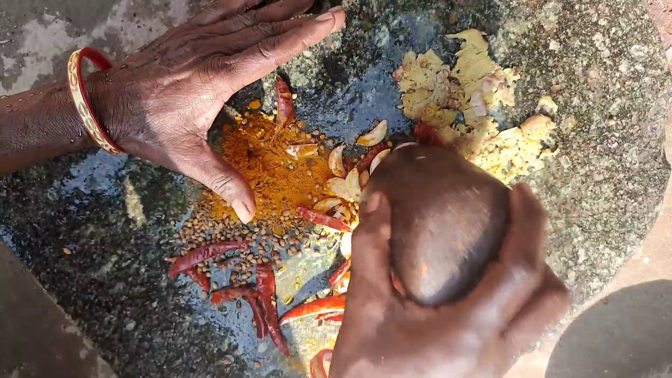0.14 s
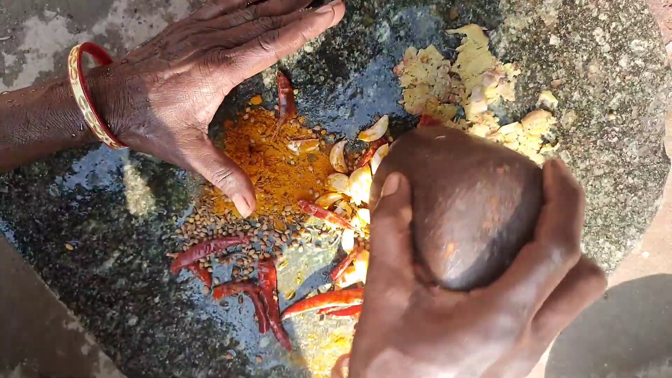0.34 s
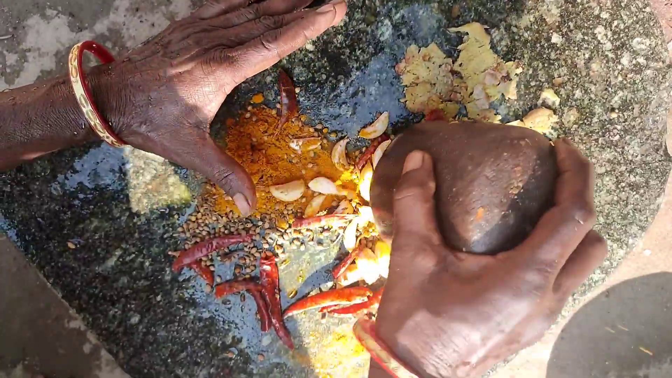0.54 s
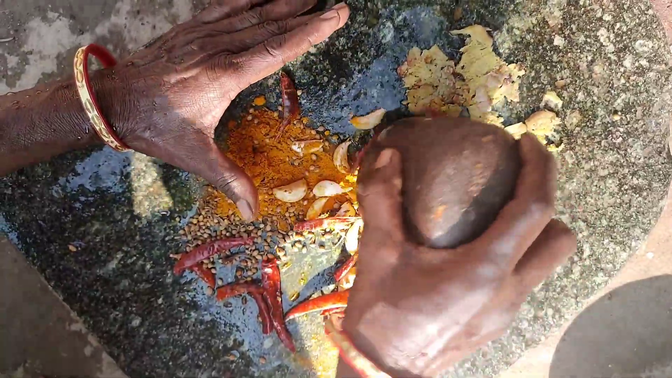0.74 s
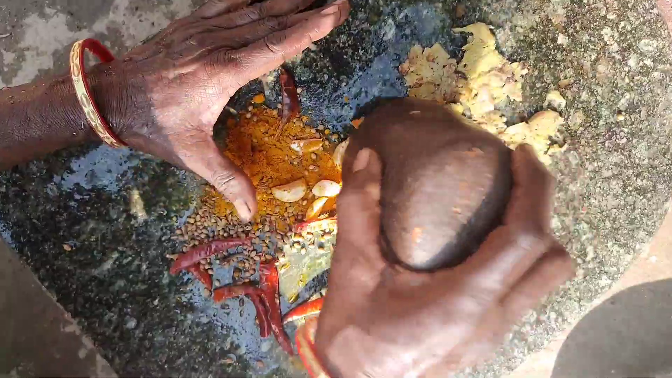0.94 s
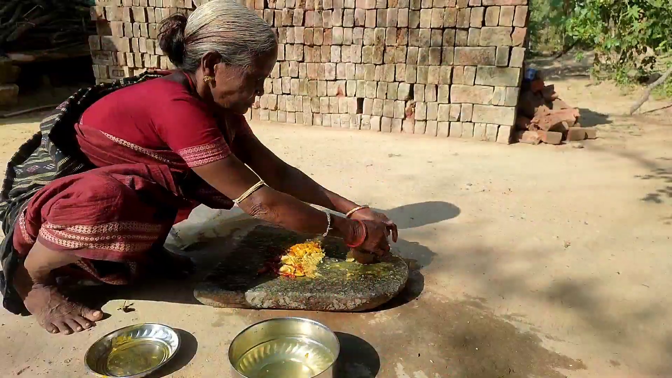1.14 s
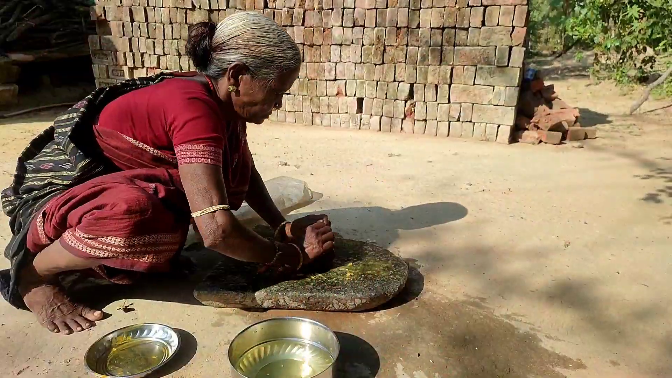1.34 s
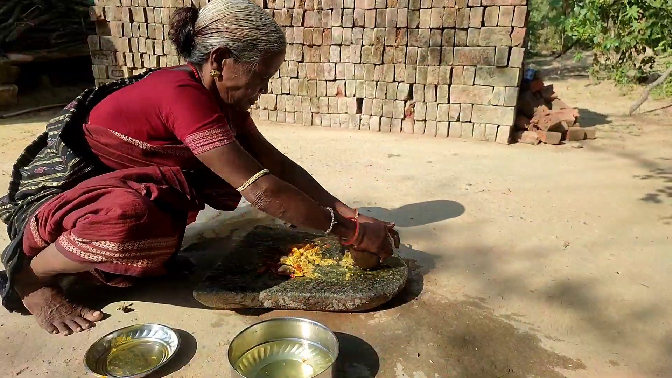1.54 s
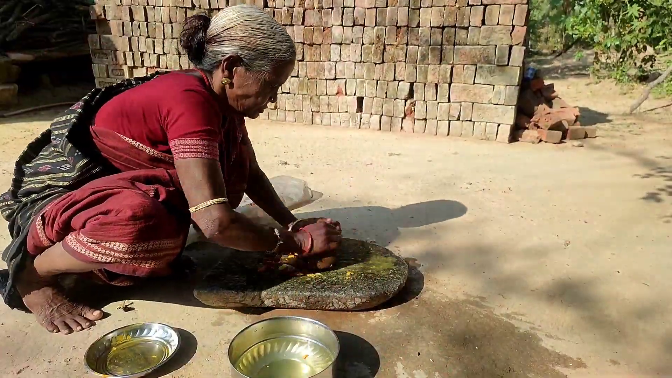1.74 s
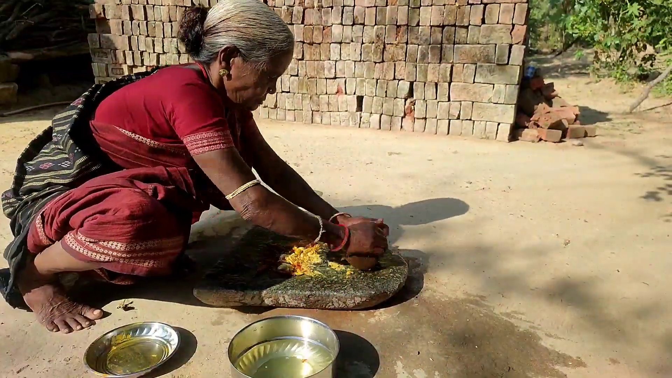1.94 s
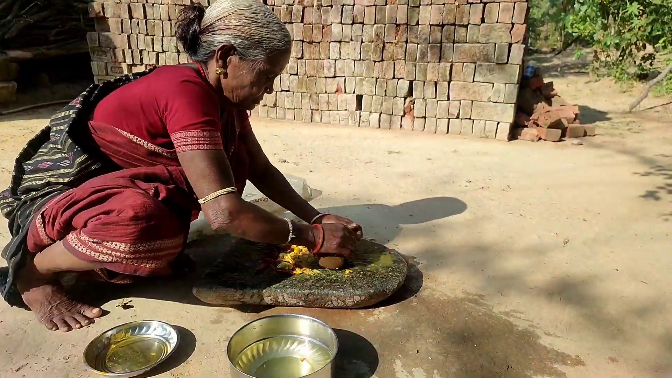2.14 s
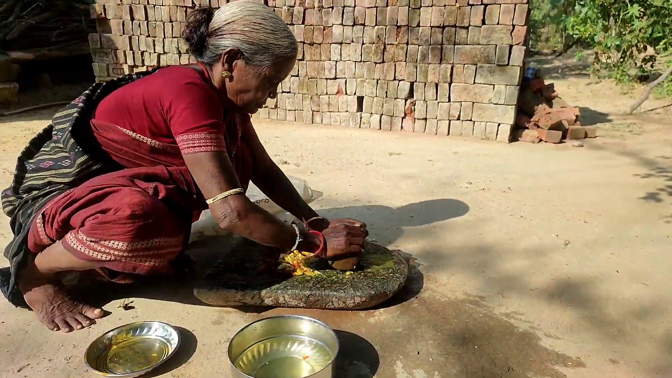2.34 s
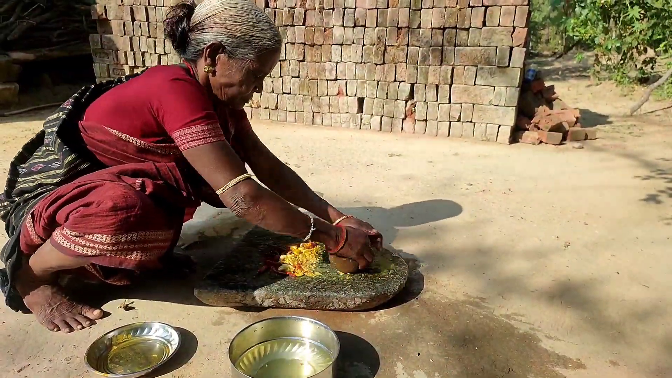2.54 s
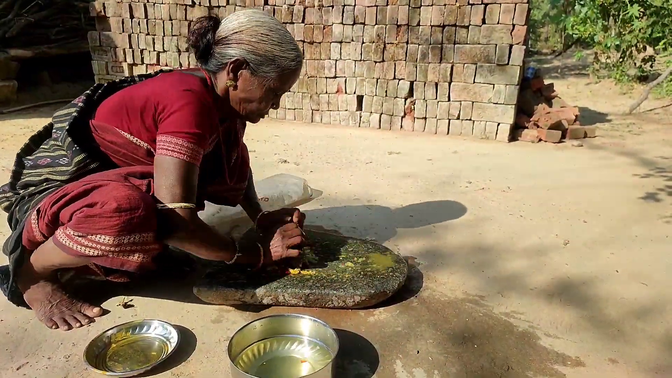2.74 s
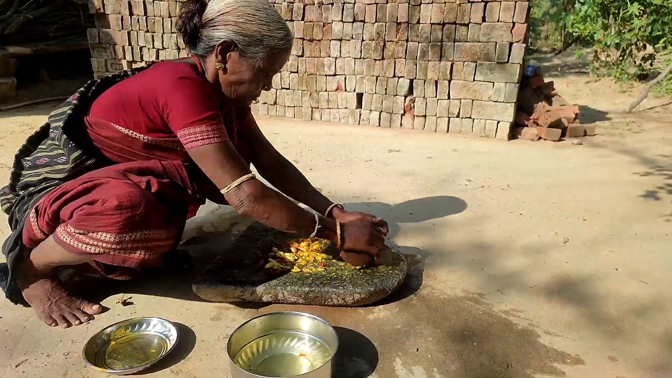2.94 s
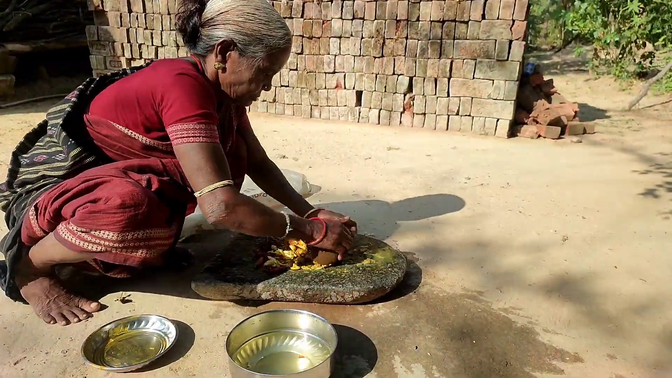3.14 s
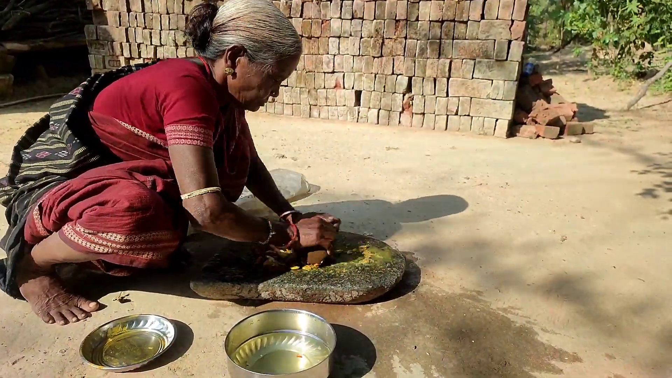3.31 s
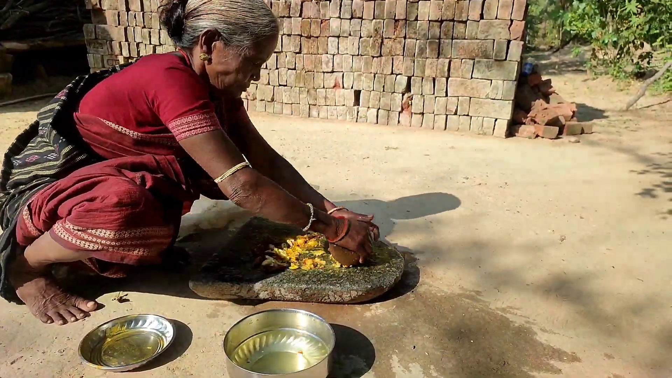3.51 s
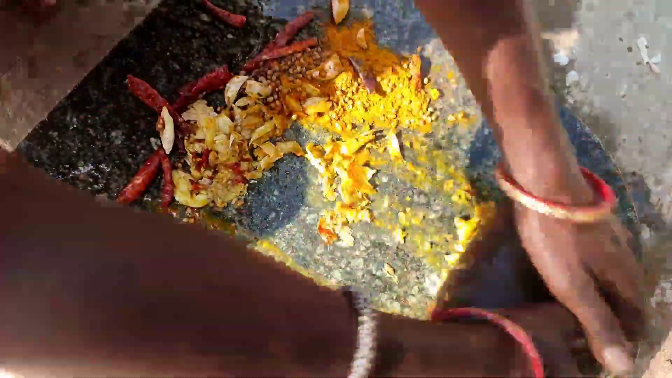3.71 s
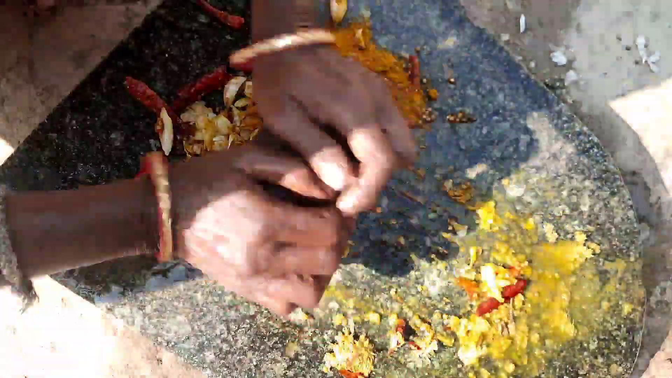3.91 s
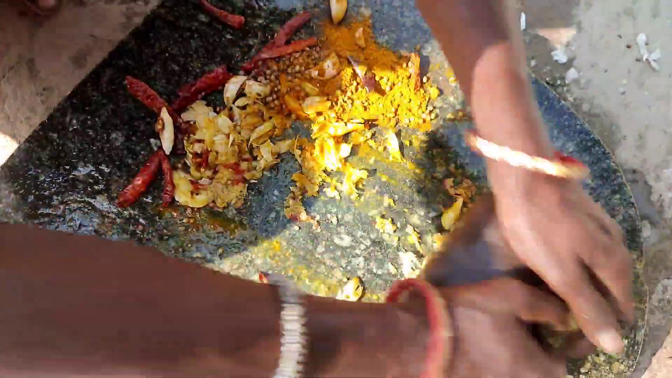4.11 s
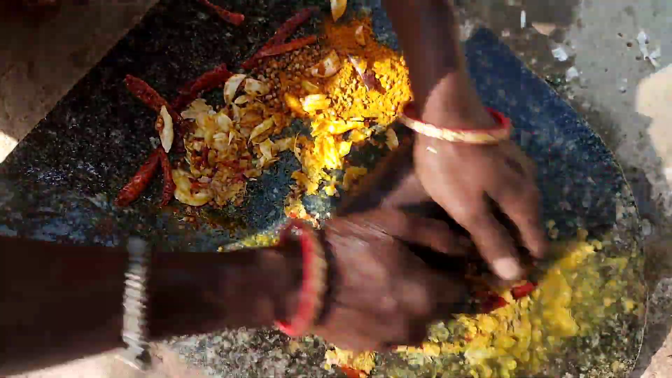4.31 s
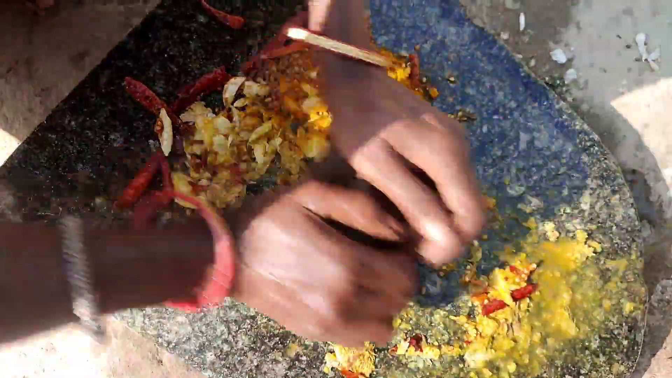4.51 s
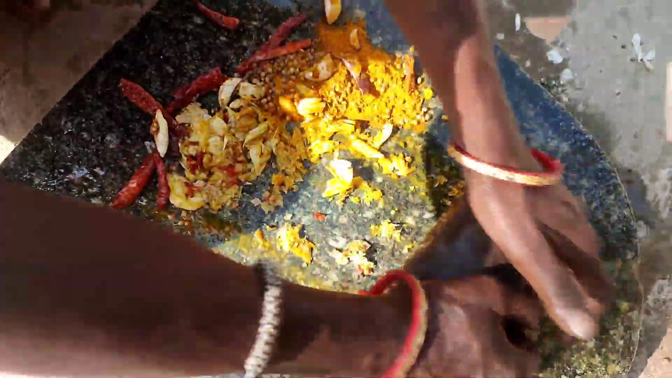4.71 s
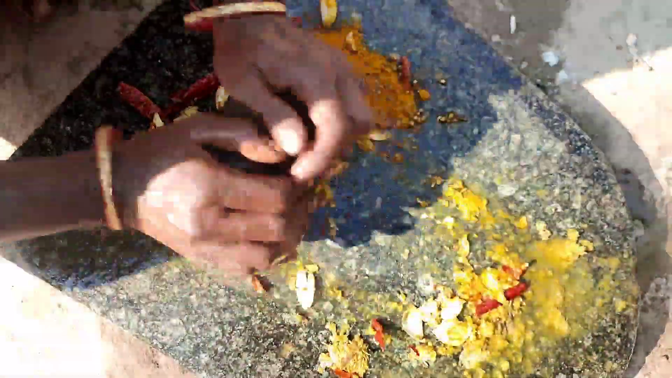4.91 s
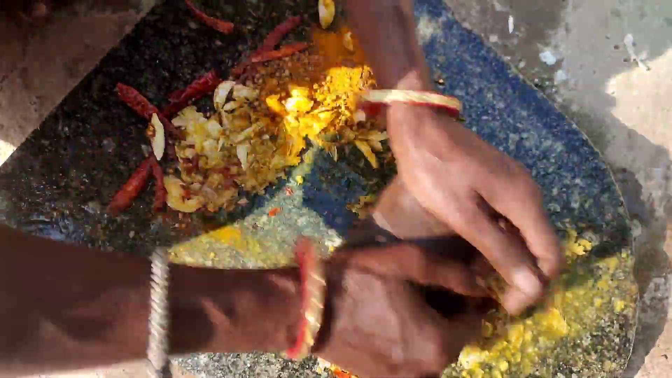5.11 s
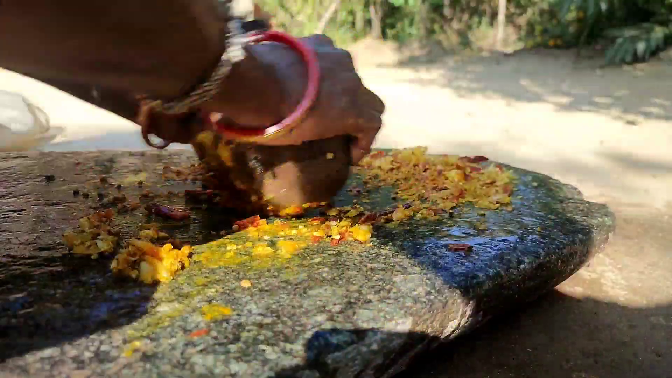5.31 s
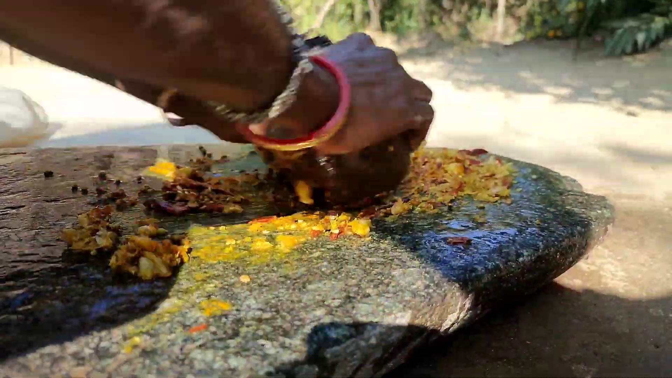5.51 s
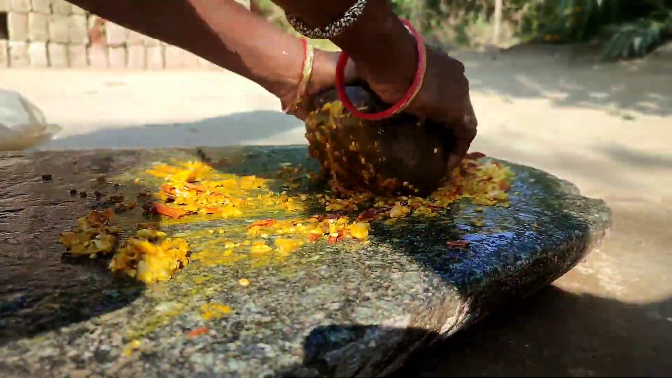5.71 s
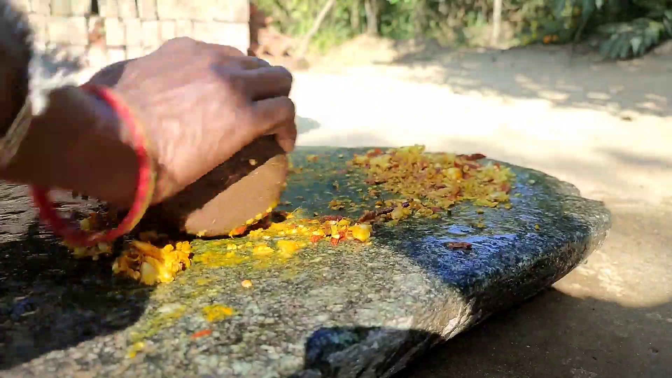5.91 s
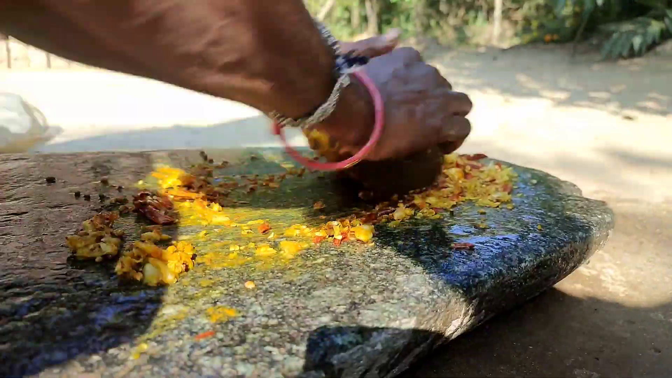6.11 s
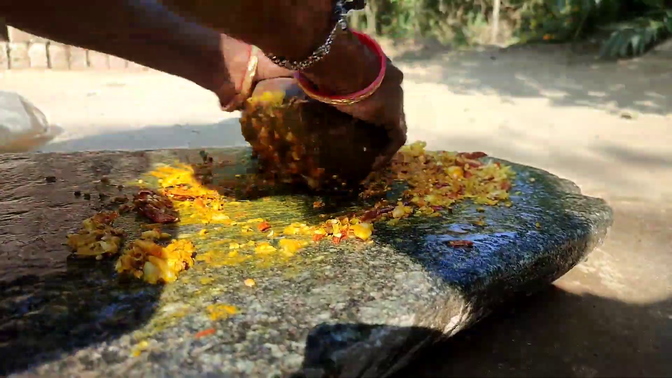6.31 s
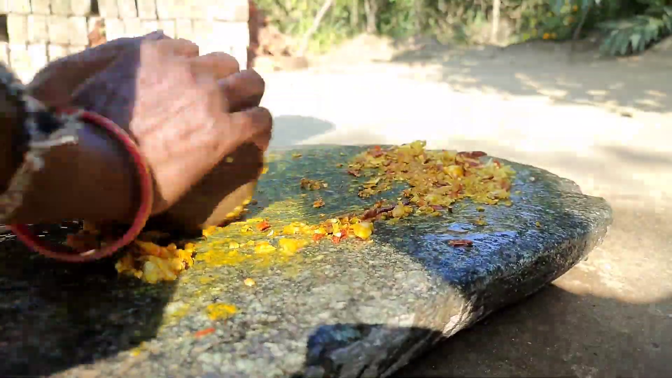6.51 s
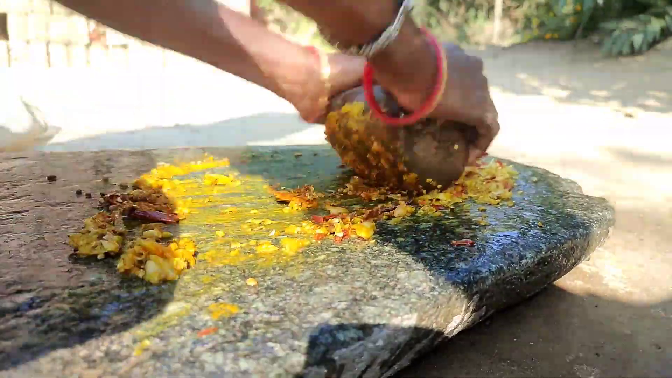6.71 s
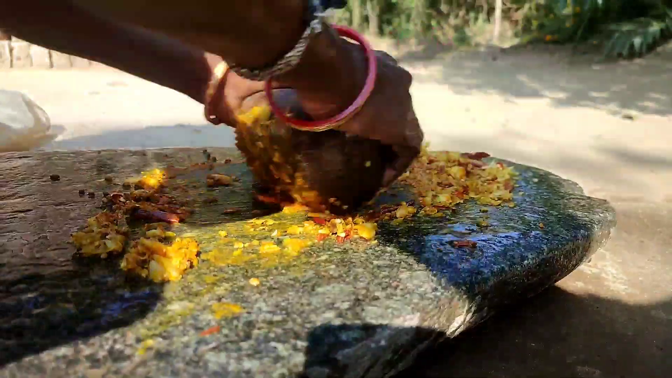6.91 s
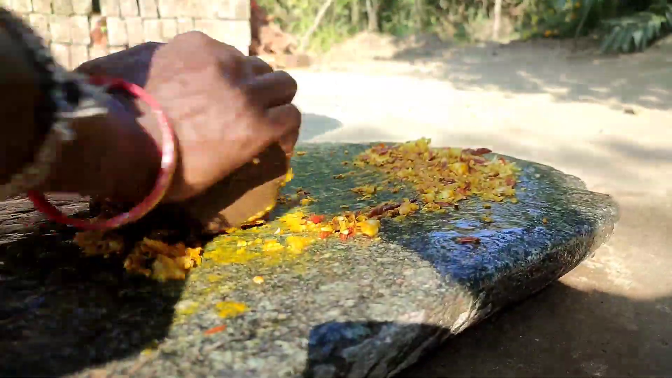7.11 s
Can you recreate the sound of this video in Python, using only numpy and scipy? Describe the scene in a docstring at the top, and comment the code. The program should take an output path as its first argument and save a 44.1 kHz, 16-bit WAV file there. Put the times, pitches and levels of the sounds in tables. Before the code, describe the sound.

Close up, a heavy stone crushes dry spices on a slab in four sharp, crunchy thumps, with faint scraping between. Then the view shifts and steady short grinding strokes follow, about four a second, gritty and hissing, with small bright stone clicks. The strokes grow louder and lower towards the end, after one more knock. Quiet open yard, light wind rumble, close stereo microphone.

```python
"""A round hand stone works spices on a flat stone slab that lies on the earth of an open yard.
It pounds four times in the first 1.1 s and once more at 5.5 s: noise cracks over a band-passed thud and slab modes.
It scrapes as it is lifted or twisted between blows until 1.3 s, then slides to and fro in short strokes:
banded random grit, with slab rumble, dull knocks and ringing clicks, heard close, then from three other places in turn.
Behind it: yard echo, filtered-noise wind and air, a low wavering sine hum and a faint far-off call of gliding sines."""
import sys
import numpy as np
from scipy import signal
from scipy.fft import rfft, irfft, next_fast_len
from scipy.io import wavfile
from scipy.ndimage import uniform_filter1d

SR = 44100
rng = np.random.default_rng(int(sys.argv[2]) if len(sys.argv) > 2 else 0)


def store_wav(level_fs):
    """Save 16-bit WAV to argv[1]."""
    pcm = np.round(np.clip(np.atleast_2d(level_fs), -1, 1) * 32767)
    wavfile.write(sys.argv[1], SR, pcm.T.astype(np.int16))


N = 315315
TIME = np.arange(N) / SR


def amp(db):
    """Decibels to gain."""
    return 10 ** (np.asarray(db) / 20)


def unit(x):
    """Scale so that the mean of the channels has rms 1."""
    mid = np.atleast_2d(x).mean(axis=0)
    return x / np.sqrt(np.mean(mid ** 2) + 1e-20)


def band(x, low_hz, high_hz, order=2):
    """Butterworth band-pass."""
    sos = signal.butter(order, [low_hz, min(high_hz, .47 * SR)], "band", fs=SR, output="sos")
    return signal.sosfilt(sos, x + 1e-18)


def colour(x, spectrum):
    """Minimum-phase filter that follows (f/Hz, gain/dB) rows, by way of the folded cepstrum."""
    size = 2 * next_fast_len(x.shape[-1] // 2 + 2048)
    hz, db = np.transpose(spectrum)
    bin_hz = np.arange(size // 2 + 1) * SR / size
    log_gain = np.log(amp(np.interp(np.log(bin_hz + 1), np.log(hz), db)))
    cepstrum = irfft(log_gain)
    cepstrum[1:size // 2] *= 2
    cepstrum[size // 2 + 1:] = 0
    response = np.exp(rfft(cepstrum))
    return irfft(rfft(x, size) * response)[..., :x.shape[-1]]


def drift(per_s):
    """Normal random points, per_s a second, joined by straight lines."""
    return np.interp(TIME * per_s, np.arange(8192), rng.standard_normal(8192))


def stereo(three, likeness):
    """One shared and two separate signals make a pair of given likeness."""
    c = np.clip(likeness, 0, 1)
    return np.sqrt(c) * three[0] + np.sqrt(1 - c) * three[1:]


def pan(db):
    """Left and right gains, left re right in dB, whose mean is 1."""
    gains = amp(np.array([db, -db]).reshape(2, -1) / 2)
    return gains / gains.mean(axis=0)


def add(out, s, sound):
    """Mix a sound in at a time."""
    at = max(round(s * SR), 0)
    out[:, at:at + sound.shape[-1]] += sound[..., :N - at]


def background(wind_trim_db=-2, hum_db=-67, hum_hz=79.9, waver_hz=1.0, half_order_db=-8,
               swell_db=9, swell_s=0.17, air_db=-78, hiss_db=-79.0):
    """Wind on the microphone, a low hum that swells and fades as of a distant engine, and still air."""
    # wind strength: t/s, level before trim/dB
    gusts = [(0, -45), (.1, -52), (.4, -47), (.95, -57), (1.07, -41.5), (1.39, -58.5), (5.3, -58),
             (5.6, -50.5), (5.85, -58.5), (7.15, -51.5)]
    # wind spectrum: f/Hz, gain/dB
    wind_colour = [(18, -4.5), (45, -7), (62, -9), (90, -16.5), (130, -20)]
    # centres of the hum's swells: t/s
    swells_s = [1.75, 2.45, 3.15, 4.22, 4.95, 6.1, 6.7]
    gust_s, gust_db = np.transpose(gusts)
    wind = colour(stereo(rng.standard_normal((3, N)), likeness=0.55), wind_colour)
    wind = amp(np.interp(TIME, gust_s, gust_db) + wind_trim_db) * unit(band(wind, 13.0, 130))
    phase = 2 * np.pi * np.cumsum(hum_hz + waver_hz * drift(11)) / SR
    swell = swell_db * sum(np.exp(-np.minimum(np.abs(TIME - s) / swell_s, 10) ** 2) for s in swells_s)
    tone = np.sin(phase) + amp(half_order_db) * np.sin(phase / 2)
    hum = amp(hum_db + swell + 1.0 * drift(21)) * np.sqrt(2) * tone
    air = stereo(rng.standard_normal((3, N)), likeness=0.064)
    air = amp(air_db) * unit(band(air, 100, 1120, order=1))
    hiss = stereo(rng.standard_normal((3, N)), likeness=0.055)
    hiss = amp(hiss_db) * unit(band(hiss, 900, 4000, order=2))
    return wind * pan(4.4) + hum + air + hiss


def far_call(overtone_db=-17, arch=0.047, waver=0.024):
    """A thin, nearly pure call from far away, perhaps a cockerel; pitch rises and falls with each note's swell."""
    # notes: start/s, length/s, base f/Hz, level/dB
    notes = [(0, 0.18, 341, -68), (0.134, 0.076, 507, -66.5), (0.322, .2, 512, -68.5),
             (.55, 0.65, 541, -78)]
    out = np.zeros(N)
    for start_s, length_s, hz, level_db in notes:
        effort = np.sin(np.pi * np.clip((TIME - start_s) / length_s, 0, 1))
        phase = 2 * np.pi * np.cumsum(hz * (1 + arch * effort + waver * drift(59))) / SR
        overtones = np.sin(2 * phase) + np.sin(3 * phase)
        out += amp(level_db) * effort * (np.sin(phase) + amp(overtone_db) * overtones)
    return out


def yard_echo(x, near_db=-21, near_s=0.025, wall_db=-31, wall_s=0.1, wall_spread_s=0.024):
    """Scatter from the ground and things nearby, then a weak smeared echo from a brick wall."""
    t = np.arange(SR // 4) / SR
    near = np.exp(-t / near_s) * (t > .003)
    wall = np.exp(-((t - wall_s) / wall_spread_s) ** 2)
    shape = amp(near_db) * near / np.linalg.norm(near) + amp(wall_db) * wall / np.linalg.norm(wall)
    echo = band(shape * rng.standard_normal((2, len(t))), 400, 14000, order=1)
    return signal.fftconvolve(x, echo, axes=1)[:, :N]


def clicking(bounce_s=.0008, bounce=1.0, scatter_db=-19, scatter_s=0.0029,
             ring_trim_db=-6, clack_trim_db=-6, snap_trim_db=-6):
    """Stone touches bare stone twice within a millisecond; ring pitch depends on the point of contact."""
    # touches: t/s, ring f/Hz, ring, clack and snap before trim/dB, left re right/dB
    clicks = [(0.536, 3930, -42.5, -72, -50.5, -1), (0.6122, 6600, -60.5, -77, -75, -12),
              (1.1692, 6540, -52.5, -61.5, -63, -6), (1.263, 4870, -52.5, -65, -57, -10),
              (1.651, 5200, -46.5, -62, -49.5, -7.5), (1.919, 3900, -44, -73, -52, -8),
              (2.078, 5650, -42.5, -62, -34, -6), (2.5146, 6400, -49.5, -60.5, -41, -9),
              (2.677, 6260, -57.5, -62, -51, -11), (2.7678, 4870, -48, -56, -55, -6),
              (2.8774, 5430, -45.5, -47.5, -50.5, -10), (3.3557, 6710, -55, -64, -58, -3),
              (3.641, 7400, -43.5, -74, -46, -1), (3.7628, 6500, -41, -44, -33.5, -7),
              (4.0015, 5070, -41.5, -56, -49.5, -2), (4.2176, 5330, -45.5, -53, -46, -5),
              (4.581, 4650, -44, -61, -54, -13), (4.683, 6140, -54, -58, -47.5, -12),
              (4.7343, 5860, -38, -52, -43, -14), (5.2317, 5260, -34, -51.5, -40.5, -9.5),
              (5.6856, 5500, -52, -52, -53.5, 7.5), (6.039, 7400, -49.5, -69, -49, 11),
              (6.0667, 4900, -52, -77, -64, 4), (6.0845, 4770, -42.5, -69, -50, 6),
              (6.5815, 4500, -41.5, -79, -48.5, 4.5), (6.672, 4600, -39.5, -76, -64.5, -1),
              (6.8312, 5040, -48, -50, -49.5, 5.5)]
    out, t = np.zeros((2, N)), np.arange(SR // 30) / SR
    for s, hz, ring_db, clack_db, snap_db, pan_db in clicks:
        touch = amp(scatter_db) * rng.standard_normal((2, len(t))) * np.exp(-t / scatter_s)
        touch[0, 3] += 1
        touch[1, 0] += 1   # the right port is a little nearer
        touch[:, round(bounce_s * SR)] += bounce * (2 * rng.random(2) - 1)
        ring = amp(ring_db + ring_trim_db) * unit(band(touch, hz * 0.73, hz * 1.35))
        clack = amp(clack_db + clack_trim_db) * unit(band(touch, 1340, 2760))
        snap = amp(snap_db + snap_trim_db) * unit(band(touch, 9900, 13100))
        add(out, s, (ring + clack + snap) * pan(pan_db))
    return out


def grit(per_s, hiss_db, spread_db=3):
    """Grains break at random, most small and a few large, over the even hiss of rubbing stone."""
    sizes = amp(spread_db * np.minimum(rng.exponential(1, N), 6))
    grains = (rng.random(N) < per_s / SR) * sizes * rng.standard_normal((3, N))
    return grains / grains.std() + amp(hiss_db) * rng.standard_normal((3, N))


def slab_response(rumble, knock_t60_s=0.056, rise_s=0.00046, overtones=(2.28, 3.6), roll_db=0, rest_db=-74):
    """The slab rumbles under the moving stone and gives brief dull knocks, damped by the hand."""
    # slab under the rolling stone: f/Hz, gain/dB
    roll_colour = [(100, -7.5), (160, 0.5), (215, 3), (270, -3), (330, -7.5), (450, -9.5), (800, -18),
                   (1500, -31)]
    # dull knocks of the slab: tipping stone, the fifth blow's body at 5.52 s and low rumble lumps near 6.1 s:
    # t/s, level/dB, f/Hz, overtones re fundamental/dB
    knocks = [(1.222, -49, 323, -6), (1.243, -41, 320, -8), (1.26, -35.5, 255, -10.5),
              (1.325, -45.5, 287, -1), (1.945, -43.5, 236, -22), (2.67, -37, 283, -4),
              (2.678, -43, 352, -2.5), (4.01, -49, 318, -10), (4.881, -39.5, 184, -8),
              (5.128, -45.5, 234, -8), (5.521, -27.5, 447, -9), (5.523, -27, 265, -17),
              (6.102, -36, 215, -22), (6.126, -38.5, 320, -14), (6.145, -34.5, 225, -19),
              (6.186, -40, 256, -19)]
    lumps = stereo(grit(per_s=600, spread_db=1, hiss_db=1.5), likeness=0.83)
    out = np.hypot(amp(roll_db) * rumble, amp(rest_db)) * unit(colour(lumps, roll_colour))
    t = np.arange(SR // 5) / SR
    fade = amp(-60 * t / knock_t60_s) * (1 - np.exp(-t / rise_s))
    for s, db, hz, overtone_db in knocks:
        phase = 2 * np.pi * hz * t
        upper = sum(amp(overtone_db) ** (k + 1) * np.sin(ratio * phase) for k, ratio in enumerate(overtones))
        add(out, s, amp(db) * (fade * np.sin(phase) + fade ** 2 * upper))
    return out


def pounding(lead_s=.012, squeeze_s=0.0039, burst_s=0.0042, landing_s=0.00088, crumble_s=0.035,
             crumble_db=-21, crush_trim_db=1.5, thud_trim_db=9, knock_trim_db=8, knock_hz=660,
             sink_s=0.0017, crush_pan_db=-2):
    """Spices crackle ever harder as the stone sinks in; then it lands, the slab thuds and crumbs settle."""
    # blows: t/s, crush, thud and knock before trim/dB, left re right before offset/dB,
    # landing hardness re squeeze/dB, gain of the crush's dull part/dB
    blows = [(0.2413, -28, -32, -40, 0, -15, 4), (0.5109, -26.5, -26.5, -35, -2.5, -3, 5.5),
             (0.7889, -24.5, -36, -60, -4, 10, 2.5), (1.0651, -23.5, -36.5, -69, -1.5, 19.5, 0.5),
             (5.5189, -34.5, -39, -29.5, -9, 20, 2)]
    # spices bursting: f/Hz, gain/dB
    crush_colour = [(290, -33), (500, -5.5), (635, -11.5), (854, -6), (1340, -9), (2320, 1), (2560, -1),
                    (3300, 3.5), (5180, 4.5), (5640, 4.5), (6590, 9.5), (7690, 2.5), (14500, -14.5)]
    # modes of the slab on the earth: f/Hz, level re thud peak/dB, t60/s
    slab_modes = [(125, -23, 0.14), (195, -11.5, 0.1), (265, -21.5, 0.1), (335, -31, 0.052)]
    out, t = np.zeros((2, N)), np.arange(SR // 4) / SR
    impulse = 1. * (t == 0)
    thud = band(impulse, 89, 190)
    thud /= np.abs(thud).max()
    for hz, db, t60_s in slab_modes:
        thud += amp(db - 60 * t / t60_s) * np.sin(2 * np.pi * hz * t)
    knock = band(impulse, knock_hz / 1.82, knock_hz * 1.435, order=3)
    knock /= np.abs(knock).max()
    since = t - lead_s
    rise = np.minimum(since, 0) / squeeze_s
    fall = np.maximum(since - .002, 0) / burst_s
    squeeze = np.exp(rise - fall) * (since > -.007)
    landing = (since > 0) * np.exp(-np.abs(since) / landing_s)
    settling = (since > 0) * amp(crumble_db) * np.exp(-np.abs(since) / crumble_s)
    for s, crush_db, thud_db, knock_db, pan_db, hard_db, dull_db in blows:
        cracks = stereo(rng.standard_normal((3, len(t))), likeness=0.25)
        cracks = cracks * amp(2.4 * rng.standard_normal(len(t)))
        crush = colour(cracks * (squeeze + amp(hard_db) * landing + settling), crush_colour)
        crush = colour(crush, [(2200, dull_db), (3600, 0.0067)])
        crush *= np.sqrt(.005 * SR) / np.linalg.norm(crush, axis=1, keepdims=True)   # rms 1 if 5 ms long
        add(out, s - lead_s, crush * amp(crush_db + crush_trim_db) * pan(pan_db + crush_pan_db))
        add(out, s, knock * amp(knock_db + knock_trim_db))
        add(out, s + sink_s, thud * amp(thud_db + thud_trim_db))   # the heavy slab answers a moment later
    return out


def scrape_power(start_s, length_s, level_db, swell_db, arch_db, attack_db_per_s=425, release_db_per_s=331):
    """Power of one scrape over time: quick attack, arched and sloping hold, slightly slower release."""
    t = TIME - start_s
    along = np.clip(t / length_s, 0, 1) - .5
    ends_db = attack_db_per_s * np.maximum(-t, 0) + release_db_per_s * np.maximum(t - length_s, 0)
    db = level_db + swell_db * along - arch_db * (2 * along) ** 2 - ends_db
    power, near = np.zeros(N), db > -120
    power[near] = amp(db[near]) ** 2
    return power


def scraping(dull_arch_db=2.5, sharp_arch_db=3.0, rumble_arch_db=7, rumble_swell=0.87, crunch_s=0.011,
             crunch_sharp_db=-1, crunch_fine_db=-8, pressure_db=.7, pressure_per_s=30,
             wander_db=1.5, wander_per_s=36):
    """Gains of dull scrape, sharp scrape, fine grit and rumble: each scrape is brightest half-way, where the
    stone is fastest; the hand presses unevenly and the colour wanders."""
    # scrapes: stone lifted or twisted between blows until 1.3 s, then sliding strokes:
    # start/s, length/s, scrape/dB, swell start to end/dB, sharp re dull/dB, fine re scrape/dB, rumble/dB
    scrapes = [(0.0, 0.098, -66.5, -14, 4, -14, -71), (0.283, 0.096, -73.5, 9, 16, -12, -82),
               (0.521, 0.16, -75.5, -17, 11, -6.5, -68), (0.81, 0.021, -57.5, -6.0, 0.5, -8, -63),
               (1.094, 0.22, -69.5, 10, 3.0, -10, -60), (1.345, 0.25, -54.5, -7.5, 2.5, -9, -68.5),
               (1.743, 0.15, -56, 0.5, 7, -9, -69.5), (1.924, 0.1, -49.0, -0.5, 7.5, -7, -61),
               (2.151, 0.15, -57.5, 10.5, 8, -8, -72), (2.372, 0.17, -57.5, -12.5, 7.5, -6.5, -66.5),
               (2.6, 0.22, -61, 3, 6, -4.5, -67), (2.878, 0.137, -48.0, -6, 2, -13, -66.5),
               (3.155, 0.15, -55, 11.5, 3.5, -11.5, -77), (3.378, 0.13, -55, -5.5, 3.5, -10, -67),
               (3.648, 0.098, -53.0, 5, -1, -4.5, -67), (3.867, 0.21, -54.5, -20.5, -1, -10.5, -67),
               (4.076, 0.14, -49.5, -2, 0.5, -8, -60.5), (4.329, 0.16, -51.5, 8, 4, -11, -59.5),
               (4.583, 0.14, -49, -2, 4.5, -9, -57), (4.835, 0.16, -49.5, -6, 4.5, -9.5, -59.5),
               (5.089, 0.18, -53.5, -18.5, 3.5, -12, -61.5), (5.418, 0.064, -54, -3.5, 3, -12, -68),
               (5.561, 0.098, -43.5, -5.5, 4.5, -10, -54.5), (5.834, 0.16, -47.5, 4.5, 5, -8.5, -63),
               (6.098, 0.158, -48.5, -12, 1.5, -7.5, -53.5), (6.303, 0.11, -53.5, 0.5, 4.5, -9, -61.5),
               (6.44, 0.093, -50, 6.5, 2.0, -13.5, -71), (6.604, 0.17, -44, 5, 3, -11, -57.5),
               (6.933, 0.2, -48.5, 2, 5.5, -8.5, -61.5)]
    # seeds giving way under the stone: t/s, level/dB
    crunches = [(1.188, -76), (1.436, -50), (1.575, -59), (2.022, -65), (3.43, -59), (3.655, -55.5),
                (3.89, -52), (4.005, -53), (4.195, -45.5), (4.424, -50), (4.583, -60), (4.652, -68),
                (5.082, -52.5), (5.166, -54), (5.545, -41), (5.591, -43.5), (6.099, -44.5), (6.711, -43)]
    dull, sharp, fine, rumble = np.zeros((4, N))
    for start_s, length_s, level_db, swell_db, bright_db, fine_db, rumble_db in scrapes:
        power = scrape_power(start_s, length_s, level_db, swell_db, dull_arch_db)
        fast = scrape_power(start_s, length_s, level_db, swell_db, sharp_arch_db)
        dull_share = 1 / (1 + amp(bright_db) ** 2)
        dull += dull_share * power
        sharp += (1 - dull_share) * fast
        fine += amp(fine_db) ** 2 * fast
        rumble += scrape_power(start_s, length_s, rumble_db, rumble_swell * swell_db, rumble_arch_db)
    crunch = np.zeros(N)
    for s, db in crunches:
        crunch += amp(db) ** 2 * np.exp(-np.minimum(np.abs(TIME - s) / crunch_s, 10) ** 2)
    dull += crunch
    sharp += amp(crunch_sharp_db) ** 2 * crunch
    fine += amp(crunch_fine_db) ** 2 * crunch
    pressure = pressure_db * drift(pressure_per_s)   # common to all four
    return [np.sqrt(power) * amp(pressure + wander_db * drift(wander_per_s))
            for power in (dull, sharp, fine, rumble)]


def crumbs(per_s=110, level_db=-4):
    """Now and then a larger crumb snaps on its own."""
    snaps = np.zeros((3, N))
    at = np.flatnonzero(rng.random(N) < per_s / SR)
    snaps[:, at] = rng.standard_normal((len(at), 3)).T
    return amp(level_db) * snaps / snaps.std()


def reflected(x, strength=0.6, wander_db=1.37):
    """Short paths by the slab, the hand and the ground comb the sound; their delays wander at random."""
    delays = [s * rng.uniform(0.798, 1.2) * amp(wander_db * drift(6)) for s in (.00025, .0009, .0028)]
    return x + strength * sum(np.interp(TIME - delay, TIME, x) for delay in delays)


def grinding(gains, span, spectrum, grains, likeness, coarse_db, scrape_db, fine_db, judder_db, pan_db):
    """The scraping stone breaks coarse, middling and fine grit and judders over the pitted slab."""
    dull, sharp, fine = gains
    heard = uniform_filter1d(1. * ((TIME >= span[0]) & (TIME < span[1])), size=256)   # smooth edges
    pair = stereo(grains + crumbs(), likeness)
    rub = colour(np.array([reflected(side) for side in pair]), spectrum)
    dull_scrape = dull * unit(band(rub, 2080, 4145, order=4))
    sharp_scrape = sharp * unit(band(rub, 4605, 8100, order=4))
    sound = amp(scrape_db) * (dull_scrape + sharp_scrape)
    sound += amp(coarse_db + 2.9 * drift(30)) * np.hypot(dull, sharp) * unit(band(rub, 693, 1944, order=4))
    sound += amp(fine_db) * fine * unit(band(rub, 8900, 13770, order=4))
    return heard * sound * pan(pan_db) * amp(judder_db * drift(110))


def scene():
    """Blows, scrapes and clicks in the open yard; the grinding's colour and side change with the position."""
    # bounds of the listening positions (close, across the yard, above the slab, beside it): t/s
    moves_s = [0, 1.3, 3.6, 5.4, 7.2]
    # scrape spectrum at each position: f/Hz, gain/dB
    close_colour = [(350, -42), (600, 10.5), (964, -10), (1100, -10), (1260, -14), (1570, -4),
                    (3850, -19.5), (6780, -15), (14000, -35)]
    across_colour = [(600, -19.5), (1100, -18), (2000, -3), (3100, 8.5), (5000, -2.5), (7800, -4.5),
                     (9500, -7.5), (11500, -6), (14200, -9)]
    above_colour = [(600, -10), (1300, -5), (1700, -3.5), (2300, -0.5), (4400, -2), (5600, -3.5),
                    (7000, -2.5), (8500, -13.5), (10300, -12.5), (12000, -10), (14200, -17.5)]
    beside_colour = [(600, -12), (1100, -20.5), (1600, -11), (2400, 0.5), (3300, 2.5), (5000, -3),
                     (7900, -4), (9700, -11), (12000, -10), (14200, -11)]
    *scrape, rumble = scraping()
    close, across, above, beside = zip(moves_s, moves_s[1:])
    work = pounding() + clicking() + slab_response(rumble)
    work += grinding(scrape, close, close_colour, grit(per_s=1600, spread_db=4, hiss_db=1.0), likeness=0.12,
                     coarse_db=-11.5, scrape_db=0.5, fine_db=8.0, judder_db=4.5, pan_db=-3)
    work += grinding(scrape, across, across_colour, grit(per_s=2500, spread_db=2.0, hiss_db=4.5), likeness=0.11,
                     coarse_db=-15, scrape_db=0.5, fine_db=5, judder_db=2, pan_db=-6.5)
    work += grinding(scrape, above, above_colour, grit(per_s=2500, spread_db=2.5, hiss_db=3.5), likeness=0.048,
                     coarse_db=-13.5, scrape_db=-1.5, fine_db=1.5, judder_db=2.0, pan_db=-5.5)
    work += grinding(scrape, beside, beside_colour, grit(per_s=2500, spread_db=2.5, hiss_db=6.0), likeness=0.022,
                     coarse_db=-18.5, scrape_db=-2.5, fine_db=-1.0, judder_db=1.5, pan_db=3)
    return work + yard_echo(work) + background() + far_call()


def record(dry, cutoff_hz=14400):
    """Each microphone port colours the sound in its own way; the top is cut steeply."""
    # port difference: f/Hz, left re right/dB
    port_colour = [(100, -0.5), (1000, 1.5), (2200, 3.5), (4200, 0.5), (7500, 1.5), (12000, 1)]
    ports = [colour(side, [(hz, sign * db / 2) for hz, db in port_colour]) for side, sign in zip(dry, (1, -1))]
    return signal.sosfilt(signal.ellip(10, .2, 75, cutoff_hz, fs=SR, output="sos"), ports)


dry = scene()
out = record(dry)
store_wav(out)
```